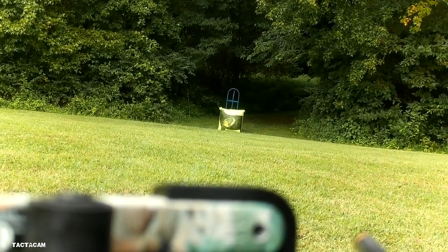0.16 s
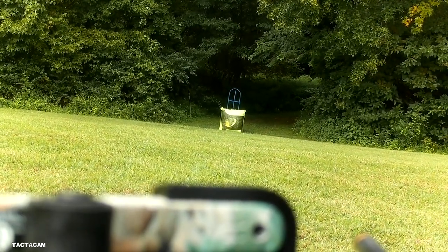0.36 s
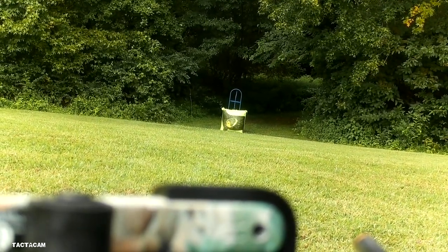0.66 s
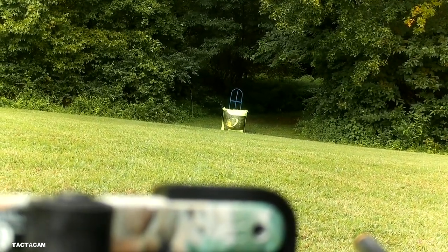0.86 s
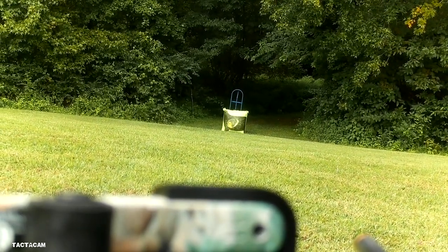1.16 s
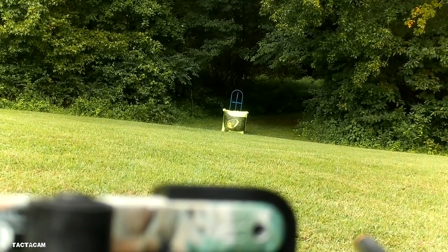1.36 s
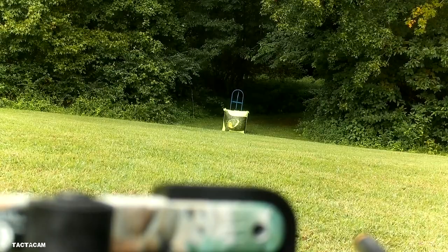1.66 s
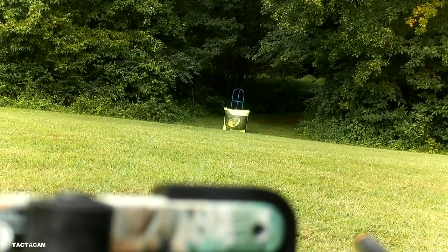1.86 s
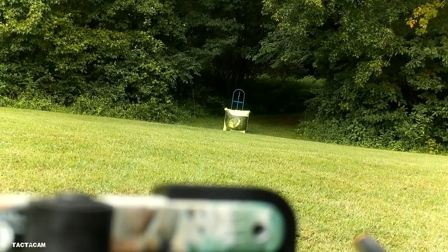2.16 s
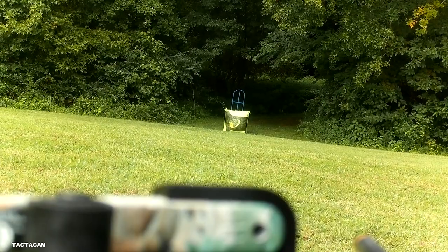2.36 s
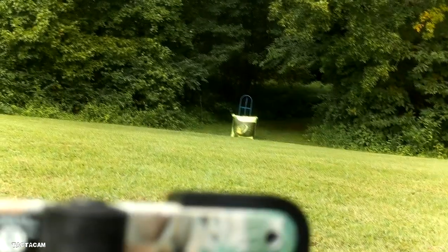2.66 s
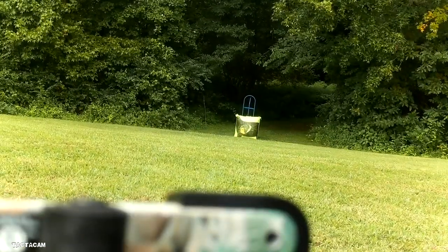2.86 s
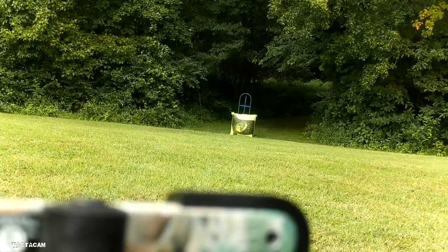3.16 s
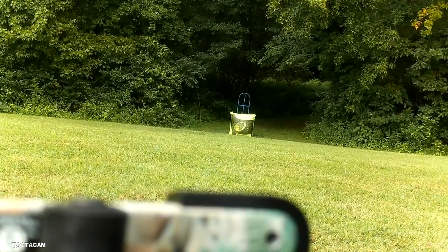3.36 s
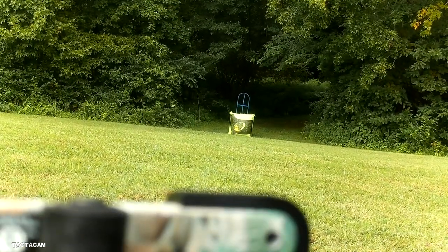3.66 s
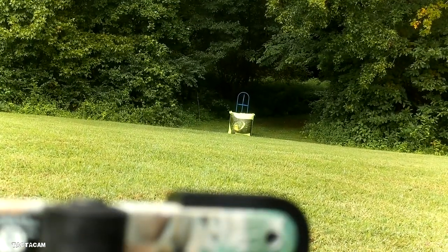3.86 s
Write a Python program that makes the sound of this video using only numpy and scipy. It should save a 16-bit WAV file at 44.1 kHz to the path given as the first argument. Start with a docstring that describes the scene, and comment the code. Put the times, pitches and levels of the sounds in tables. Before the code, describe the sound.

A loud, dry crossbow snap breaks steady insect chirring, its echo washes off the trees, and a faint far thud follows.

```python
"""A mown field with trees behind: a crossbow is fired, heard from its stock.
The latch snaps, the string slams into its stops, the frame rattles: decaying noise and struck damped modes.
The trees echo as diffuse noise; the bolt thuds into a far bag as a falling tone with noise.
Crickets and a katydid, trilled noise bands, sing over a low rumble and a faint hum; hands shift late.
The whole level steps down before the shot, dips briefly late on and steps up again."""
import sys
import numpy as np
from scipy import signal
from scipy.fft import rfft, irfft, next_fast_len
from scipy.io import wavfile

SR = 44100
rng = np.random.default_rng(int(sys.argv[2]) if len(sys.argv) > 2 else 0)


def store_pcm(level_fs):
    """Save levels as 16-bit WAV."""
    pcm = np.round(np.clip(level_fs, -1, 1) * 32767).astype(np.int16)
    wavfile.write(sys.argv[1], SR, np.atleast_2d(pcm).T)


N = 176708
T = np.arange(N) / SR

# Blows on the bow: the latch slips and lets go, the string slams into its stops and bounces,
# then swings back and rattles. Each row: start in seconds, strength in dB, struck part in Hz,
# snap in dB re strength, thump into the stock in dB re strength.
BLOWS = [(2.4448, -29, 3970, -8, -20.5), (2.4463, -13.5, 3750, 9, -27), (2.4535, -8.5, 2020, 5.5, 2.5),
         (2.4580, -18.5, 3570, -9, -4.5), (2.4893, -33, 1303, -11, -23.5), (2.4919, -25.5, 3730, -11, -27),
         (2.4996, -21.5, 5040, -7, -21), (2.5062, -27.5, 5200, -2, -4.5), (2.5231, -30, 2140, -11, -4)]
# Modes of the limbs, rail and cams. Each row: frequency in Hz, level in dB, t60 in seconds, capped in ring().
FRAME_MODES = [(1055, -1.5, 0.085), (1122, 1.5, 0.078), (1234, 2.5, 0.078), (1330, 2.5, 0.067),
               (1445, -5, 0.054), (1695, -3, 0.053), (1940, -4, 0.038), (2070, -3, 0.045),
               (3160, -11, .045), (3484, -8, 0.069), (3730, -11.5, .045), (3660, -9.5, 0.03),
               (3980, -10.5, .045), (4320, -9, .05), (4770, -13.5, .07), (4800, -11.5, 0.083)]
# Low modes of the stock and string stops. Each row: frequency in Hz, level in dB, t60 in seconds.
STOCK_MODES = [(57.95, -14.5, 0.051), (180, -12.5, 0.014), (299, -4, 0.019), (377.5, 3.5, .046),
               (480, -7, .03), (697, -9, .04)]
# Short rings after the blows: the frame's lingering 1143 Hz tone, then three small late ticks.
# Each row: start in seconds, level in dB, pitch in Hz.
LATE_RINGS = [(2.4729, -25, 1143), (2.5646, -44, 2860), (2.5712, -40, 2130), (2.5875, -37, 3580)]

# Relative noise spectra. Each row: frequency in Hz, density in dB per Hz.
# Clatter of the bow after a blow, columns as above.
CLATTER_SPECTRUM = [(100, -24), (600, -16), (850, -7.5), (1200, -2), (2100, 2.5), (2500, -11), (3500, 1),
                    (5000, -6), (6500, -8), (8000, -15), (14000, -22.5), (16000, -27)]
# Bright snap of a blow, columns as above.
SNAP_SPECTRUM = [(500, -15), (3000, -6), (5500, 1.5), (8000, -7), (9500, -2.5), (10800, 1.5), (12500, -3.5),
                 (14500, -9.5), (16000, -19.5)]
# Dull, padded blow, columns as above.
THUMP_SPECTRUM = [(40, -7), (80, 0), (130, -6.5), (200, -1.5), (350, 2.5), (480, -9.5), (600, -15),
                  (1200, -38.5)]
# Shot scattered by the grass, columns as above.
GRASS_SPECTRUM = [(100, -3), (600, -9), (1200, 0), (2400, -1.5), (3300, 3), (6300, -4), (8000, -12.5),
                  (11000, -20), (15000, -27)]
# Shot returned by the tree line, columns as above.
TREES_SPECTRUM = [(100, -4.5), (700, -3), (1250, 4), (2500, -3.5), (5500, -4), (8000, -18), (14000, -37)]
# Outdoor rumble and hiss, columns as above.
AIR_SPECTRUM = [(15, -11.5), (30, 1.5), (62, 0), (90, -7.5), (130, -12.5), (200, -18.5), (380, -25.5),
                (850, -26.5), (1500, -30.5), (2600, -35), (5500, -36.5), (9000, -42.5), (15000, -44.5)]
# Cricket chorus, columns as above.
CRICKET_SPECTRUM = [(5000, -47.5), (5750, -24), (6040, -5), (6170, -8.5), (6400, 0), (6600, -3), (6730, 2),
                    (6900, -2), (7080, -3), (7500, -9.5), (8000, -13), (8600, -27.5), (10000, -46)]
# Katydid buzz, columns as above.
KATYDID_SPECTRUM = [(10000, -35), (11800, -8), (12500, 0), (13000, 0), (13400, -1.5), (13900, -5.5),
                    (14300, -15), (15500, -23)]
# Bolt piercing the bag cover, columns as above.
PIERCE_SPECTRUM = [(300, 3), (700, 5), (1300, -21), (2400, -15), (3300, 1), (4200, -9), (5500, 9),
                   (6400, -7.5), (8000, -26), (11000, -20), (15000, -32)]
# Woods answering the hit, columns as above.
WOODS_SPECTRUM = [(30, -11), (80, 4.5), (200, -2), (330, -10.5), (600, -21), (2000, -43)]

# Harmonics of the far hum, first and second. Each entry: level in dB.
HUM_HARMONICS_DB = [0.5, -12.5]
# Katydid phrases. Each row: middle of the fade in, middle of the fade out, both in seconds.
PHRASES = [(-.2, 1.3), (2.76, 4.3)]
# Steps of the whole level. Each row: start in seconds, new level in dB, ramp in seconds.
STEPS = [(1.497, 0, .018), (3.811, 6.3, .004)]

SNAP_T60_S, PART_T60_S = .0068, .035
# for the hardest blow; per dB below it the frame rings less and the clatter lasts longer
FRAME_HARDEST_DB, FRAME_LOSS_DB_PER_DB = -3, .4
CLATTER_DB, CLATTER_HARDEST_T60_S, LOOSENING_S_PER_DB = 1, .041, .0013
DAMPED_T60_MAX_S = .07
SHUDDER_DB, SHUDDER_T60_S = -4.5, .055  # dB re the stock's ring
LATE_T60_S, LATE_TICK_DB, LATE_BUZZ_DB = .026, -15.5, -1.5  # dB re the late ring's tone
HIT_S = 2.8172
KATYDID_NOISE_DB, PHRASE_FADE_S = -86, .25
START_DB = 9
DIP_S, DIP_WIDTH_S, DIP_DB = 3.810, .002, -12
CEILING = .85  # share of full scale
TOP_HZ = 15300


def undb(db):
    """Decibels to amplitude gain."""
    return 10 ** (np.asarray(db) / 20)


def noise(spectrum):
    """Noise of rms 1, coloured by a spectrum interpolated over log frequency."""
    hz, db = np.transpose(spectrum)
    size = next_fast_len(N)
    bins_hz = np.maximum(np.fft.rfftfreq(size, 1 / SR), 1)
    gain = undb(np.interp(np.log(bins_hz), np.log(hz), db))
    y = irfft(rfft(rng.standard_normal(size)) * gain, size)[:N]
    return y / y.std()


def fade(start_s, t60_s):
    """Sudden onset, then exponential decay by 60 dB in t60."""
    return (T >= start_s) * np.exp(-np.log(1000) * np.maximum(T - start_s, 0) / t60_s)


def swell(centre_s, width_s):
    """Gaussian rise and fall."""
    return np.exp(-.5 * ((T - centre_s) / width_s) ** 2)


def ramp(start_s, length_s):
    """Straight rise from 0 to 1."""
    return np.clip((T - start_s) / length_s, 0, 1)


def walk(rate_hz):
    """Random drift: straight lines between normal random knots."""
    knots = rng.standard_normal(256)
    return np.interp(T * rate_hz, np.arange(len(knots)), knots)


def ring(modes, start_s, scatter_db, signed=False):
    """Damped modes struck at one moment; the point of contact weights each of them anew."""
    hz, db, t60_s = np.transpose(modes)[:, :, None]
    t60_s = np.minimum(t60_s, DAMPED_T60_MAX_S)  # no mode rings longer than DAMPED_T60_MAX_S
    t = T[:SR // 4]
    chance = rng.standard_normal((2, len(hz), 1))
    gain = undb(db + scatter_db * chance[0])
    if signed:
        gain = gain * np.sign(chance[1])
    decay = np.exp(-np.log(1000) * t / t60_s)
    tone = np.sum(gain * np.sin(2 * np.pi * hz * t) * decay, axis=0)
    initial_rms = np.sqrt(np.sum(gain ** 2) / 2)
    return np.interp(T - start_s, t, tone, left=0, right=0) / initial_rms


def rough_tone(hz):
    """Rough tone: noise peaked at one pitch."""
    return noise([(hz / 2, -40), (hz / 1.4, -12), (hz, 0), (hz * 1.2, -12), (hz * 2, -40)])


def scatter(sound, arrival):
    """Level of a diffuse echo: countless paths add in power, spread over the arrival times."""
    power = signal.fftconvolve(sound ** 2, arrival ** 2)[:N]
    return np.sqrt(np.maximum(power, 0))


def crickets(count=8):
    """Far crickets, each trilling at its own wing rate, merge into one shimmering band."""
    chorus = 0
    for wing_hz in rng.uniform(35, 210, count):
        turns = np.cumsum(wing_hz * (1 + .04 * walk(rate_hz=5))) / SR
        trill = 1 + .27 * np.sin(2 * np.pi * turns)
        chorus = chorus + noise(CRICKET_SPECTRUM) * trill * undb(1.3 * walk(rate_hz=3.3))
    return undb(-59.5) * chorus / chorus.std()


def katydid():
    """High buzz in phrases that fade in and out, swelling on every wing stroke."""
    mean_wing_hz = 43.1
    turns = np.cumsum(mean_wing_hz * (1 + .011 * walk(rate_hz=6))) / SR
    strokes = (1 + .55 * np.sin(2 * np.pi * turns)) * undb(1.5 * walk(rate_hz=25))
    effort = 0
    for start_s, end_s in PHRASES:
        fade_in = ramp(start_s - PHRASE_FADE_S / 2, PHRASE_FADE_S)
        ended = ramp(end_s - PHRASE_FADE_S / 2, PHRASE_FADE_S)
        effort = effort + fade_in - ended
    return undb(KATYDID_NOISE_DB) * effort * noise(KATYDID_SPECTRUM) * strokes / strokes.std()


def air():
    """Low outdoor rumble under a smooth distant hiss: one noise with a slightly wavering level."""
    return undb(-51.0) * noise(AIR_SPECTRUM) * undb(.297 * walk(rate_hz=2.2))


def hum():
    """Faint far hum: two harmonics, wavering in pitch and level."""
    mean_hz = 135
    turns = np.cumsum(mean_hz * (1 + .008 * walk(rate_hz=5.1))) / SR
    tone = 0
    for harmonic, db in enumerate(HUM_HARMONICS_DB, start=1):
        tone = tone + undb(db) * np.sin(2 * np.pi * harmonic * turns)
    return undb(-64.0) * tone * undb(1.5 * walk(rate_hz=7.1))


def crossbow():
    """Each blow gives a bright snap, the struck part's clack, a clatter, the frame's ring and the stock's thump."""
    snap_noise, clatter_noise, shudder_noise = noise(SNAP_SPECTRUM), noise(CLATTER_SPECTRUM), noise(THUMP_SPECTRUM)
    hardest_db = max(row[1] for row in BLOWS)
    out = 0
    for start_s, db, part_hz, snap_db, thump_db in BLOWS:
        shift = rng.integers(N)  # fresh stretch of each noise
        softer_db = hardest_db - db
        snap = undb(snap_db) * fade(start_s, SNAP_T60_S) * np.roll(snap_noise, shift)
        clack = fade(start_s, PART_T60_S) * rough_tone(part_hz)
        clatter_t60_s = CLATTER_HARDEST_T60_S + LOOSENING_S_PER_DB * softer_db
        clatter = undb(CLATTER_DB) * fade(start_s, clatter_t60_s) * np.roll(clatter_noise, shift)
        frame_db = FRAME_HARDEST_DB - FRAME_LOSS_DB_PER_DB * softer_db
        frame = undb(frame_db) * ring(FRAME_MODES, start_s, scatter_db=1.0, signed=True)
        # the stock rings low while the rubber stops shudder
        shudder = undb(SHUDDER_DB) * fade(start_s, SHUDDER_T60_S) * np.roll(shudder_noise, shift)
        thump = ring(STOCK_MODES, start_s, scatter_db=3.5) + shudder
        out = out + undb(db) * (snap + clack + clatter + frame + undb(thump_db) * thump)
    return out


def field(shot):
    """The grass scatters the shot back almost at once; the tree line answers later and duller."""
    grass = undb(-61.0) * noise(GRASS_SPECTRUM) * scatter(shot, fade(.02, t60_s=.9))
    trees = undb(-74.5) * noise(TREES_SPECTRUM) * scatter(shot, swell(centre_s=.33, width_s=.17))
    return grass + trees


def late_rings():
    """Each gives a tick, a short tone and a buzz."""
    out = 0
    for start_s, db, hz in LATE_RINGS:
        tick = undb(LATE_TICK_DB) * fade(start_s, SNAP_T60_S) * noise(SNAP_SPECTRUM)
        tone = ring([(hz, 0, LATE_T60_S)], start_s, scatter_db=1)
        buzz = undb(LATE_BUZZ_DB) * fade(start_s, LATE_T60_S) * rough_tone(hz)
        out = out + undb(db) * (tick + tone + buzz)
    return out


def target():
    """The bolt ticks through the cover and thuds into the filling; the woods behind rumble in reply."""
    tick = undb(-32) * noise(PIERCE_SPECTRUM) * fade(HIT_S, t60_s=.008)
    # the pitch of the thud falls as the filling crumples and slows the bolt
    age_s = np.maximum(T - HIT_S, 0)
    start_hz, end_hz, braking_s, push_s = 360, 90, .0052, .0054
    hz = end_hz + (start_hz - end_hz) * np.exp(-age_s / braking_s)
    turns = np.cumsum(hz * (age_s > 0)) / SR
    push = np.sqrt(age_s / push_s) * np.exp(-age_s / push_s)
    thud = undb(-22.5) * np.sin(2 * np.pi * turns)
    crumple = undb(-35.5) * noise(THUMP_SPECTRUM)
    woods = undb(-44.5) * noise(WOODS_SPECTRUM) * swell(centre_s=2.883, width_s=.022)
    return tick + push * (thud + crumple) + woods


def grip():
    """The hands shift softly on the stock after the shot: a brief swell of low noise."""
    rub = noise([(80, -25.5), (190, -3.5), (280, -4.5), (380, -20.0), (900, -46.0)])  # Hz, dB per Hz
    return undb(-51.5) * rub * swell(centre_s=3.775, width_s=.02)


def scene():
    """The shot, its echo and the hit over the summer field."""
    shot = crossbow() + late_rings()
    background = crickets() + katydid() + air() + hum()
    return (background + shot + field(shot) + target() + grip())[None]


def record(dry):
    """The level steps and dips, the crack overloads the microphone and the top is cut."""
    level_db = START_DB
    for start_s, new_db, ramp_s in STEPS:
        level_db = level_db + (new_db - level_db) * ramp(start_s, ramp_s)
    gain = undb(level_db + DIP_DB * swell(DIP_S, DIP_WIDTH_S))
    clipped = np.clip(dry * gain, -CEILING, CEILING)
    low_pass = signal.ellip(12, .2, 80, TOP_HZ, fs=SR, output="sos")  # .2 dB ripple, 80 dB stop
    return signal.sosfilt(low_pass, clipped)


dry = scene()
out = record(dry)
store_pcm(out)
```